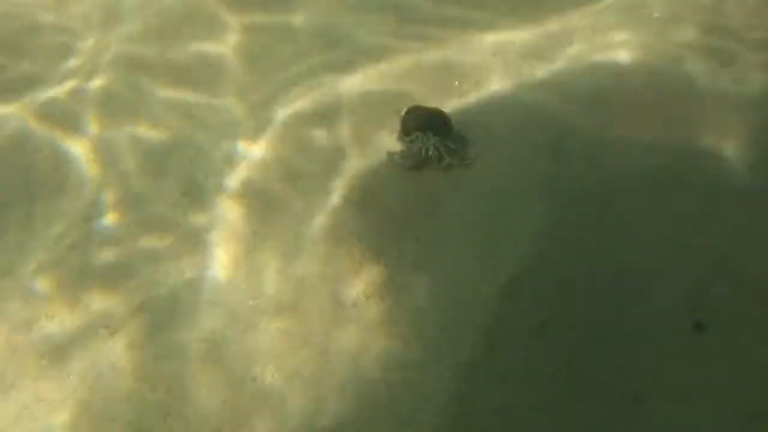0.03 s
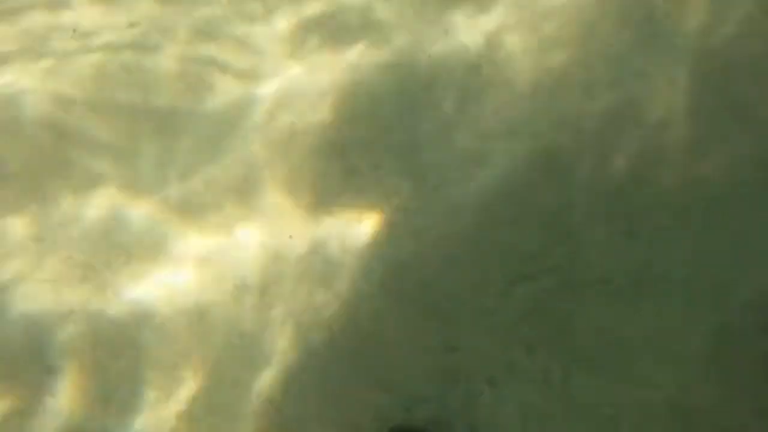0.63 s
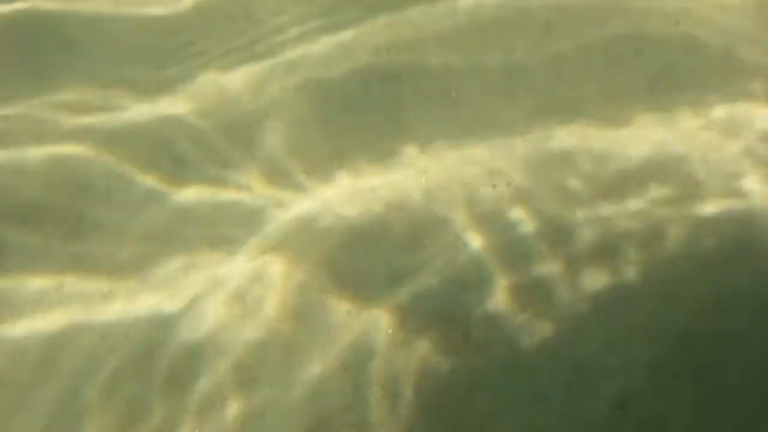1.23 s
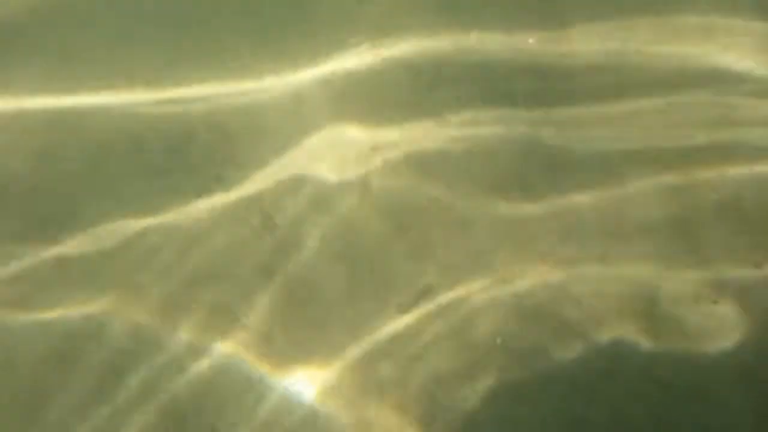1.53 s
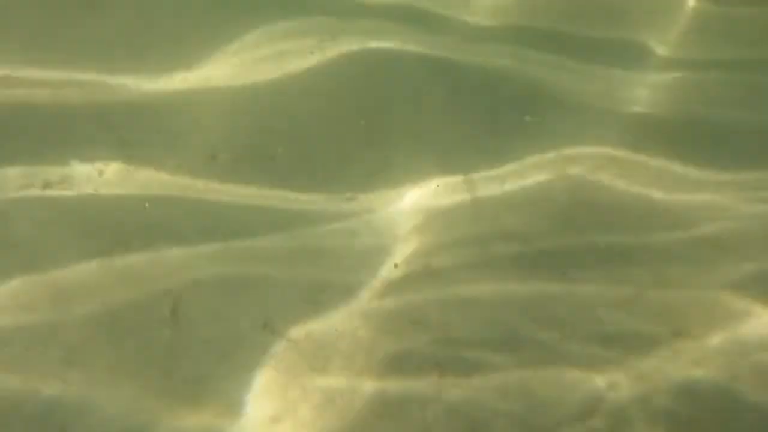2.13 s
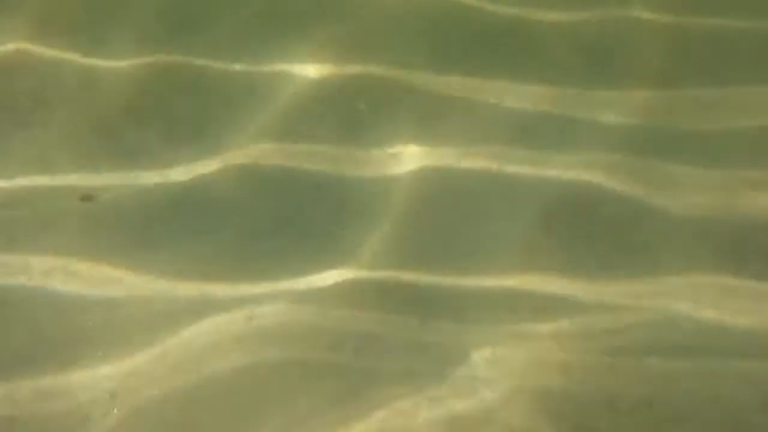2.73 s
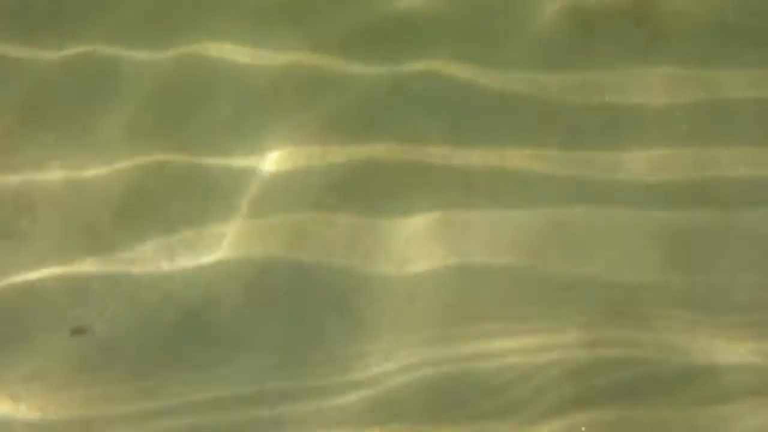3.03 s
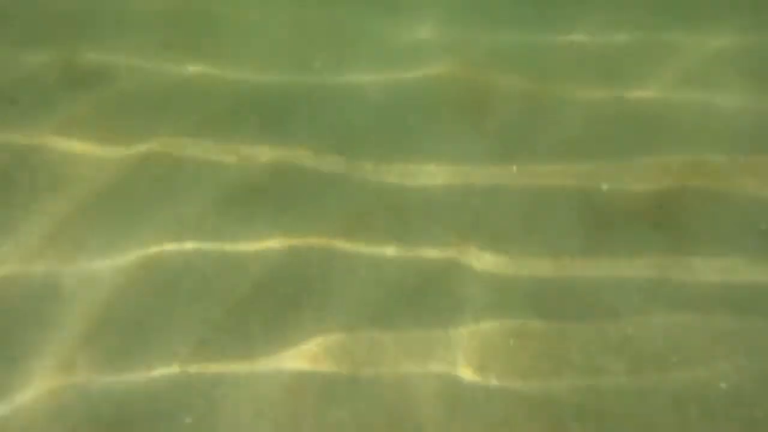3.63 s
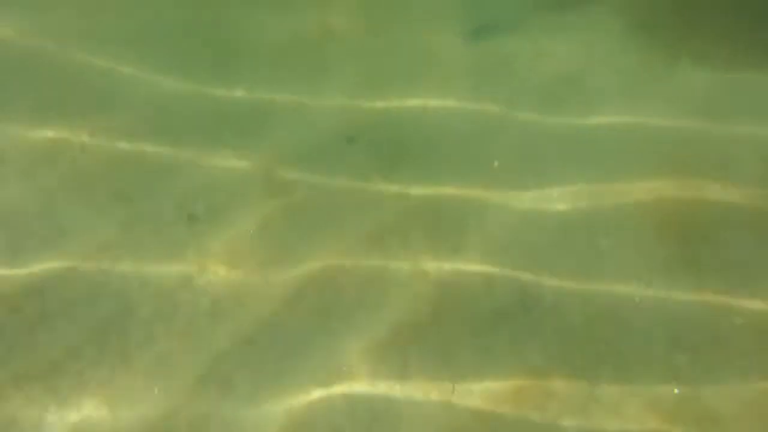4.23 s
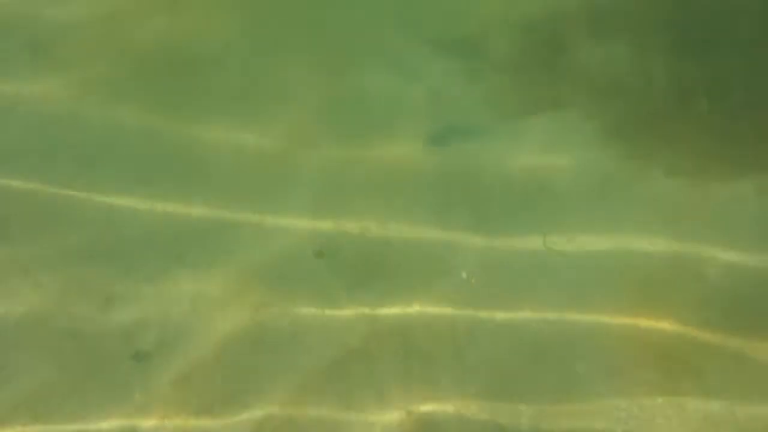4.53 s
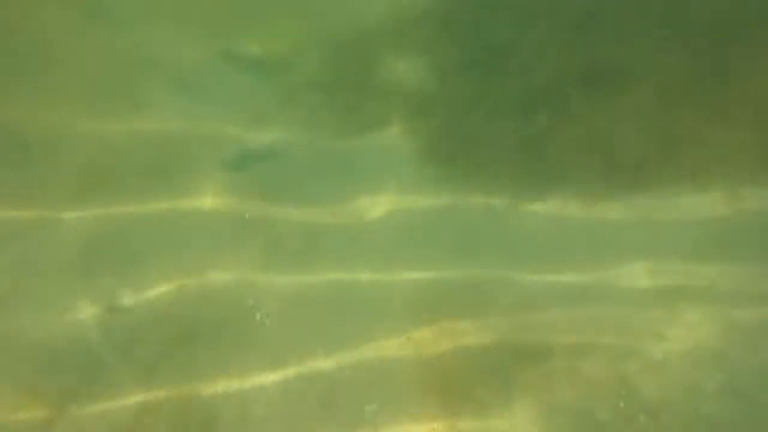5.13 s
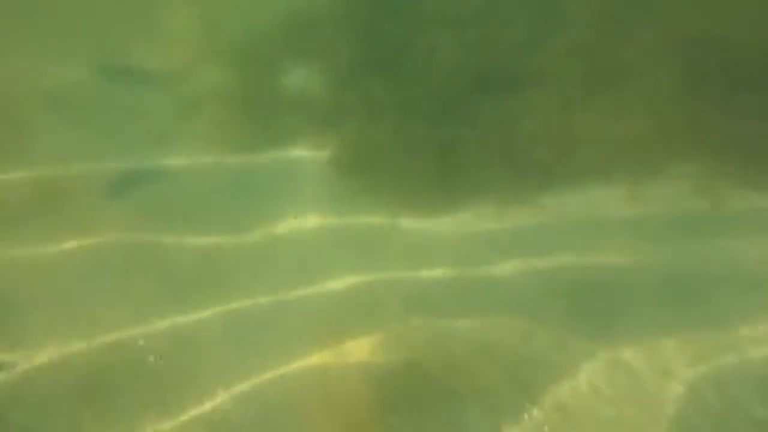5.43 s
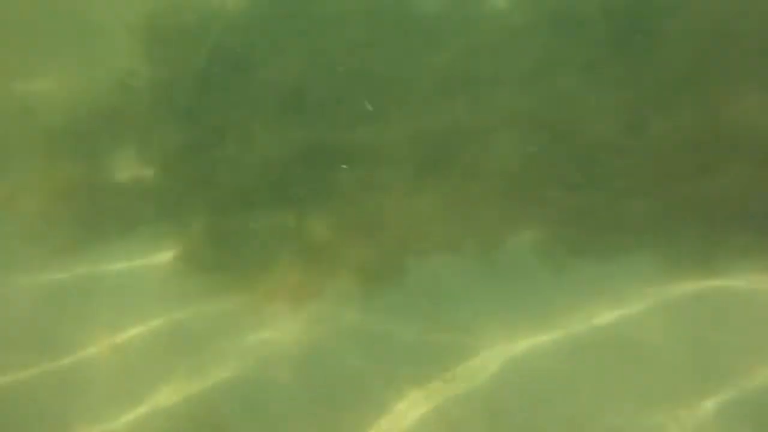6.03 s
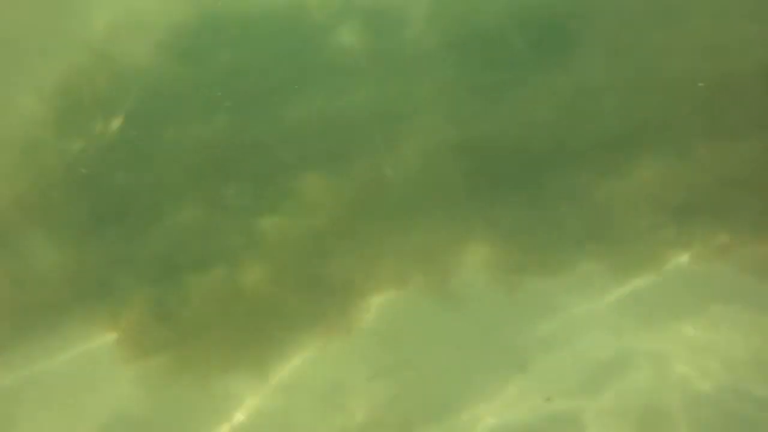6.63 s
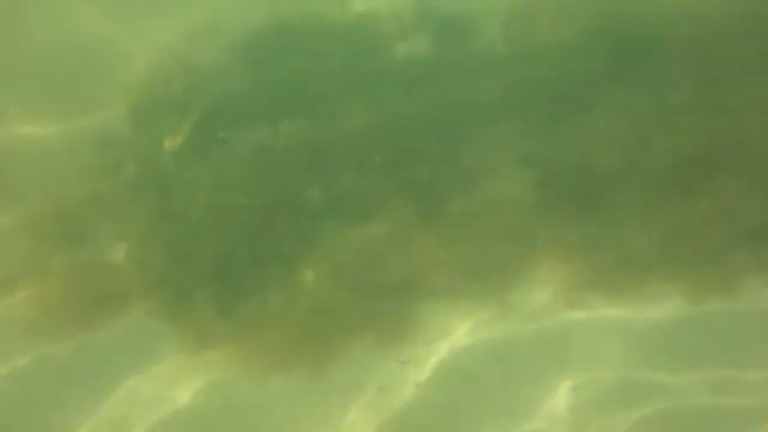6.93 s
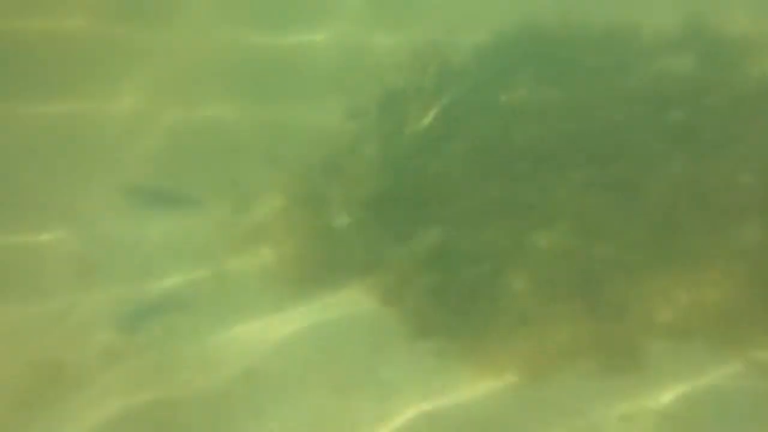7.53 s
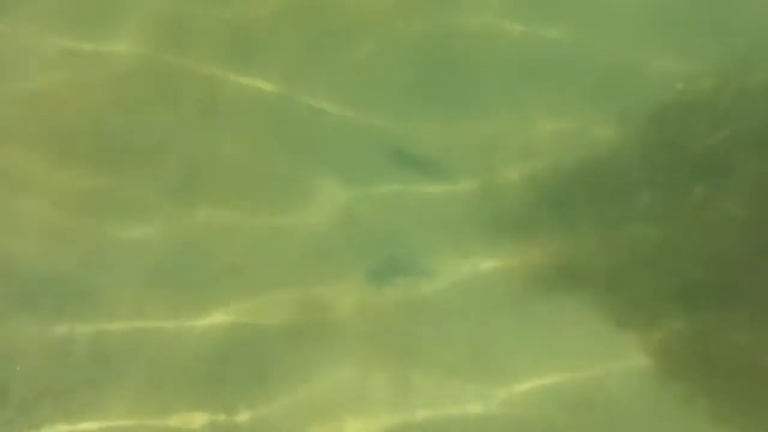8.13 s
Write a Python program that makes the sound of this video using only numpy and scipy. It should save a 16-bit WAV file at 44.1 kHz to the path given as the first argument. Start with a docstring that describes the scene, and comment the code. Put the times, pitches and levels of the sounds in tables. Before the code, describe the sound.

Low underwater rumble with soft, dull bumps against a camera case, a few sharp ticks and small bubbles.

```python
"""Shallow sea water rumbles against the waterproof case of a camera carried through it.
Eddies press on the case, soft pushes bump it and gushes pass over it; the hand on it and stray sand
excite its damped modes as sharp ticks. Small bubbles ring as resonators, a soft wash grows as the
water gets livelier, and a fine hiss swells with the whole sound."""
import sys
import numpy as np
from scipy import signal
from scipy.fft import rfft, irfft
from scipy.io import wavfile
from scipy.ndimage import uniform_filter1d

SR = 44100
rng = np.random.default_rng(int(sys.argv[2]) if len(sys.argv) > 2 else 0)


def digitize_waveform(pressure):
    """Quantize a signal to 16-bit integers and store it at the path in sys.argv[1].

    Rows of a 2-D input are taken as channels; values are limited to [-1, 1].
    """
    field = np.atleast_2d(pressure).T
    bounded = np.clip(field, -1, 1)
    quanta = np.round(bounded * 32767).astype(np.int16)
    wavfile.write(sys.argv[1], SR, quanta)


N = 370440
TIME = np.arange(N) / SR
BIN_HZ = np.arange(N // 2 + 1) * SR / N

# Modes of the water-damped case, in low, middle and high groups: pitch_hz, level_db, t60_s
CASE_MODES = [
    [(1120, -25, 0.005), (1590, -12.5, 0.0059)],
    [(2750, -24, 0.0065), (4780, -12.5, 0.0039), (5600, -13, 0.0027)],
    [(7270, -5.5, 0.0048), (8080, 0.5, 0.0025), (8930, -2.5, 0.0016), (10200, -30, 0.0019)],
]


def from_db(db):
    """Amplitude ratio: tenfold for every 20 dB."""
    return 10 ** (np.asarray(db) / 20)


def power_sum_db(db, *amplitudes):
    """Incoherent sources add in power: a level in dB joined by further amplitudes."""
    return 10 * np.log10(from_db(db) ** 2 + sum(amplitude ** 2 for amplitude in amplitudes))


def unit_rms(x):
    """Normalisation to unit mean power."""
    return x / np.sqrt(np.mean(x ** 2) + 1e-20)


def envelope(x, span_s):
    """Running rms: the root of the locally averaged power."""
    size = max(int(span_s * SR), 1)
    return np.sqrt(np.abs(uniform_filter1d(uniform_filter1d(x ** 2, size), size)) + 1e-18)


def lag(x, time_constant_s):
    """First-order relaxation: the output follows the input with an exponential memory."""
    fade = np.exp(-1 / (time_constant_s * SR))
    return signal.lfilter([1 - fade], [1, -fade], x)


def curve(rows):
    """Linear interpolation of (time_s, value) rows at every sample."""
    return np.interp(TIME, *np.transpose(rows))


def coloured(x, spectrum):
    """Spectral shaping by gains interpolated over log frequency; unit rms."""
    hz, db = np.transpose(spectrum)
    gain = from_db(np.interp(np.log(np.maximum(BIN_HZ, 1)), np.log(hz), db))
    return unit_rms(irfft(rfft(x) * gain, N))


def drift(rate_hz):
    """Random fluctuation: low-passed noise of unit rms."""
    return unit_rms(irfft(rfft(rng.standard_normal(N)) / (1 + (BIN_HZ / rate_hz) ** 2), N))


def ring(force, hz, t60_s):
    """Damped oscillator: a unit impulse starts a decaying sine of height 1."""
    decay = np.exp(-np.log(1000) / (t60_s * SR))
    step = 2 * np.pi * hz / SR
    return signal.lfilter([0, np.sin(step)], [1, -2 * decay * np.cos(step), decay ** 2], force + 1e-18)


def add(out, start_s, sound):
    """Superposition of a sound from its starting time."""
    at = max(int(round(start_s * SR)), 0)
    out[at:at + len(sound)] += sound[:N - at]


def fizz(sound, knee_db=-43.0, exponent=0.47, ceiling_db=-64.0, flutter_db=2.0):
    """Amplitude modulation: a fine hiss follows the envelope of the sound and saturates above a knee."""
    # Hiss spectrum: frequency_hz, gain_db
    spectrum = [(30, -1), (300, 9.5), (1000, 4.5), (2500, 0.5), (3600, -3), (4700, -4), (6000, -1.5),
                (7500, 0), (9000, .5), (10200, 2), (12000, 1), (16000, 2)]
    loudness = lag(envelope(sound, span_s=0.0023), time_constant_s=0.011) / from_db(knee_db)
    opening = (loudness / np.sqrt(1 + loudness ** 2)) ** exponent
    hiss = coloured(rng.standard_normal(N), spectrum)
    return hiss * opening * from_db(ceiling_db + flutter_db * drift(rate_hz=30))


def sand(taps_per_s=7, spread_db=3.5, weakest_db=-65.5):
    """Impact excitation: stray grains arrive as a Poisson process and ring the high modes of the case."""
    sizes = from_db(weakest_db + spread_db * np.minimum(rng.exponential(1, N), 3))
    sizes *= rng.choice([-1, 1], N)
    taps = sizes * (rng.random(N) < taps_per_s / SR)
    return sum(ring(taps, hz, t60_s) * from_db(db) for hz, db, t60_s in CASE_MODES[-1])


def stir(lively_db=-60, lift_db=1.0, unrest_db=1.5):
    """Common modulation: the slow, restless swell of the water, in dB relative to its lively state."""
    # Liveliness of the water: time_s, level_db
    liveliness = [(0, -78.5), (1.15, -84), (1.5, -75.5), (1.75, -80.5), (2.5, -81), (3.5, -77.5),
                  (3.8, -71), (4.12, -74.5), (4.55, -65), (4.8, -76), (5.15, -70), (5.5, -60), (5.75, -68),
                  (6.0, -64), (6.2, -72.5), (6.9, -65), (7.42, -61), (8.2, -64), (8.4, -63.5)]
    return curve(liveliness) + lift_db + unrest_db * drift(rate_hz=10.4) - lively_db


def swish(stir_db, gush, lively_db=-71, stir_share=0.66, flutter_db=3.0):
    """Resonance under broadband forcing: fast water excites a narrow, hissy band of the case."""
    # Response of the case to fast water: frequency_hz, gain_db
    spectrum = [(1000, -9.5), (3600, -14.5), (4100, -13), (4550, -1.5), (5000, -8), (5800, -16),
                (8000, -12.5), (14000, -12.5)]
    level_db = power_sum_db(lively_db + stir_share * stir_db, gush)
    hiss = coloured(rng.standard_normal(N), spectrum)
    return hiss * from_db(level_db + flutter_db * drift(rate_hz=130))


def churn(gush, push, gush_db=-9.0, push_db=-40, flutter_db=3.5):
    """Turbulent noise: stirred water makes a broad, dull rush, raised by gushes and bumps."""
    # Strength of the churn around the case: time_s, level_db
    strength = [(0, -91), (.35, -86), (.7, -80), (1.8, -83), (2.1, -83.5), (2.8, -89), (3.15, -71.5),
                (3.8, -76.5), (4.1, -80.5), (4.47, -65.5), (4.95, -79), (5.43, -72.5), (6.3, -74),
                (7.15, -66.5), (7.88, -64.5), (8.15, -70), (8.4, -64.5)]
    # Churn spectrum: frequency_hz, gain_db
    spectrum = [(40, -29), (200, 9.5), (350, 6), (550, 2), (800, -3.5), (1100, -9), (1500, -6.5),
                (2300, -22.5), (3200, -34), (8000, -46)]
    level_db = power_sum_db(curve(strength), from_db(gush_db) * gush, from_db(push_db) * push)
    rush = coloured(rng.standard_normal(N), spectrum)
    return rush * from_db(level_db + flutter_db * drift(rate_hz=35))


def wash(stir_db, gush, lively_db=-60, stir_share=1.166, bubbles_per_s=900, t60_cycles=30):
    """Source and filter: many faint bubbles over a smooth rush, heard through the case's resonances."""
    # Wash spectrum through the case: frequency_hz, gain_db
    spectrum = [(40, -40), (300, -6), (750, -2.5), (1000, -1.5), (1250, 2), (1460, 3), (1650, -1.5),
                (1900, -12), (2300, -10), (2500, -26.5), (2800, -10.5), (3500, -30), (6000, -30.5),
                (9000, -38)]
    spread_db, flutter_db = 3.0, 1.5
    sizes = from_db(spread_db * np.minimum(rng.exponential(1, N), 4)) * rng.choice([-1, 1], N)
    births = sizes * (rng.random(N) < bubbles_per_s / SR)
    pitches_hz = np.geomspace(900, 3200, num=30)
    pitch_index = rng.integers(0, len(pitches_hz), N)
    cloud = sum(ring(births * (pitch_index == k), hz, t60_cycles / hz) * hz
                for k, hz in enumerate(pitches_hz))
    water = coloured(cloud, spectrum) + coloured(rng.standard_normal(N), spectrum)
    level_db = power_sum_db(lively_db + stir_share * stir_db, gush)
    return unit_rms(water) * from_db(level_db + flutter_db * drift(rate_hz=42))


def bubbles(kick_db=5.5, rise_cycles=1.9, t60_cycles=74):
    """Bubble resonance: pinch-off kicks the case, and the ringing pitch slides with depth and shape."""
    # Single bubbles: start_s, level_db, pitch_hz, slide_fraction
    plinks = [(1.988, -51.5, 1630, -0.054), (2.025, -42.5, 1430, -0.19), (4.923, -49, 1380, -.08),
              (5.248, -50.5, 1490, 0.043), (5.678, -48, 1610, -0.051), (5.823, -50.5, 1580, -.07),
              (5.883, -46, 1380, .03), (6.327, -45, 1306, 0.08), (6.411, -50, 1400, 0.05),
              (6.513, -53.5, 1120, 0.0074), (6.648, -51.5, 1154, .05), (6.715, -34, 1530, -0.069),
              (7.003, -59, 1350, .1), (7.093, -52, 2020, .01), (7.197, -46.5, 1535, -.1),
              (7.905, -48.5, 1210, .1), (7.981, -43.5, 1574, -.08), (8.006, -50.5, 2750, -0.00014)]
    out, t = np.zeros(N), np.arange(SR // 6) / SR
    kick = from_db(kick_db) * ring(1.0 * (t == 0), hz=175, t60_s=0.024)
    for start_s, level_db, pitch_hz, slide in plinks:
        t60_s = t60_cycles / pitch_hz
        hz = pitch_hz * (1 + slide * np.minimum(t / t60_s, 1))
        rise = 1 - np.exp(-t * pitch_hz / rise_cycles)
        decay = np.exp(-np.log(1000) * t / t60_s)
        tone = rise * decay * np.sin(2 * np.pi * np.cumsum(hz) / SR)
        add(out, start_s, from_db(level_db) * (kick + tone))
    return out


def ticks(crunch_s=0.001, band_hz=(880, 11500)):
    """Stick-slip: the hand's snap and tiny crunch ring the case; a hard slip favours the high modes."""
    # Slips: start_s, level_db, bright_db (high modes over the rest), middle_db (middle modes over low)
    slips = [(1.295, -58.5, 7, 0), (1.3720, -45.5, 14, -12), (2.6080, -49, 11, -9),
             (2.6364, -48.5, 15.5, -16), (2.9416, -50, 4, -8), (2.9511, -40, 10, -13), (2.9665, -47, 5, 0),
             (3.1358, -47.5, 11, -8), (3.1802, -44, -37, 2.5), (3.2188, -38.5, -2, 13),
             (3.247, -50, -33, -5), (3.4302, -47.5, 6, 0), (3.4383, -26.5, -6.5, 0),
             (4.3446, -45.5, -17, -6), (4.355, -47, 5, -1), (4.3656, -43.5, 13, -8),
             (4.3707, -29.5, -8.5, -1), (4.4475, -48.5, 10, 0), (4.4646, -47, -8, 20), (4.4706, -48, 2, 4),
             (4.8696, -48, -7, 0), (5.0397, -51, -5, 5), (5.3404, -45, 6, 7), (6.113, -60, -13, 18),
             (7.0332, -39, -7, -1), (7.4294, -53, 3, -7), (7.7238, -42.5, -10, 5), (7.907, -50, -26, -8),
             (8.1055, -51, -3, -8)]
    out, t = np.zeros(N), np.arange(SR // 50) / SR
    for start_s, level_db, bright_db, middle_db in slips:
        crunch = 0.09 * rng.standard_normal(len(t)) * np.exp(-t / crunch_s)
        force = (t == 0) + crunch
        groups = [sum(ring(force, hz, t60_s) * from_db(db) for hz, db, t60_s in modes)
                  for modes in CASE_MODES]
        group_db = np.array([-bright_db - middle_db, -bright_db + middle_db, bright_db]) / 2
        add(out, start_s, from_db(level_db) * (from_db(group_db) @ np.array(groups)))
    return signal.sosfilt(signal.butter(3, band_hz, "band", fs=SR, output="sos"), out + 1e-18)


def gushes(attack_s=0.015, hold_share=0.083):
    """Transient flow: each gush rises fast, holds and ebbs; gives envelopes for rumble, wash and swish."""
    # Gushes over the case: peak_s, length_s, rumble_db, wash_db, swish_db
    surges = [(0.082, 0.079, -53, -68, -66), (0.396, 0.096, -51, -72, -71.5), (0.924, .1, -45, -81, -91),
              (1.349, 0.085, -43, -70, -72), (1.584, 0.079, -48.5, -74, -79),
              (1.917, 0.069, -46.5, -67, -71), (2.055, 0.098, -44.5, -71, -84), (2.46, 0.18, -44, -80, -90),
              (2.938, 0.095, -48.5, -71, -70), (3.337, 0.085, -64, -85, -70.5),
              (3.651, 0.079, -66, -60.5, -66), (3.894, 0.084, -49, -67, -85),
              (4.191, 0.05, -47.5, -71, -83), (4.466, 0.2, -42.5, -65, -66), (5.226, 0.13, -43.5, -65, -70),
              (5.326, 0.074, -49, -60, -64), (5.41, 0.23, -39.5, -60.5, -82), (5.76, .12, -54, -69.5, -73),
              (5.974, .09, -49, -59, -65.5), (6.414, 0.039, -41.5, -73, -84), (6.886, 0.019, -44, -85, -64),
              (7.417, 0.11, -48, -57, -70), (8.29, 0.11, -45, -56.5, -66)]
    out = np.zeros((3, N))
    for peak_s, length_s, *levels_db in surges:
        shape = np.interp(TIME - peak_s, [-attack_s, 0, hold_share * length_s, length_s], [0, 1, 1, 0])
        out += np.outer(from_db(levels_db), shape)
    return out


def bumps(sag=0.092, skew=0.2):
    """Damped oscillation: a soft push rocks the case for a few cycles; pitch sags as water damps it."""
    # Dull bumps on the case: peak_s, level_db, pitch_hz, width_s (at half height)
    pushes = [(0.184, -27.5, 110, 0.014), (0.293, -25.5, 115, 0.012), (0.396, -26.5, 102.5, .011),
              (0.492, -33, 104.4, 0.0095), (0.681, -37, 109, 0.011), (0.922, -48, 130, 0.0085),
              (0.943, -38.5, 95.8, 0.0059), (1.236, -41.5, 128, 0.009), (1.364, -41, 135.2, .015),
              (1.384, -26.5, 98.6, 0.0098), (1.44, -33, 99.4, .016), (1.522, -17.5, 122.5, 0.012),
              (1.534, -32.5, 88.8, 0.015), (2.066, -35, 118.2, 0.01), (2.332, -38.5, 89.4, 0.016),
              (2.396, -30, 110, 0.0085), (2.616, -18, 89.2, 0.0096), (2.788, -24.5, 119.1, 0.011),
              (2.957, -39, 129.4, 0.0036), (3.041, -32, 146.3, 0.0084), (3.173, -29.5, 115.7, 0.0073),
              (3.316, -37.5, 130.5, 0.0088), (3.443, -36, 164.7, 0.0059), (3.654, -35, 134.7, 0.0061),
              (3.847, -35.5, 123, 0.016), (3.896, -29, 105, 0.011), (4.353, -24.5, 120.7, 0.0099),
              (4.377, -28, 130.6, 0.0042), (4.488, -19, 140.7, 0.011), (4.509, -26.5, 81.6, 0.0068),
              (4.691, -31, 109, .007), (4.755, -27.5, 116.2, 0.0063), (4.842, -28, 115, 0.0083),
              (4.911, -29.5, 114.7, 0.0058), (4.987, -26.5, 113.4, .007), (5.027, -17, 123.8, 0.0093),
              (5.344, -33.5, 110.3, 0.017), (5.498, -32, 122.4, 0.017), (5.68, -22.5, 108.7, 0.014),
              (6.358, -20, 109.5, .013), (6.559, -33, 105.5, 0.022), (6.718, -28.5, 144, 0.0087),
              (7.013, -26, 106.6, 0.0092), (7.093, -31.5, 132.3, 0.0095), (7.227, -28, 96.7, 0.013),
              (7.323, -36, 100.7, .008), (7.394, -32, 118, 0.0057), (7.45, -28.5, 123.5, .01),
              (7.482, -36, 103, 0.0099), (7.869, -32, 128.3, 0.021), (7.989, -28.5, 121.5, 0.0088),
              (8.113, -32, 125.9, 0.0085), (8.31, -29.5, 102.8, 0.0096)]
    out, t = np.zeros(N), np.arange(-SR // 16, SR // 16) / SR
    for peak_s, level_db, pitch_hz, width_s in pushes:
        age = t / width_s
        stretch = 1 + skew * np.tanh(2 * age)  # rises faster than it dies
        swell = 2 ** -((2 * age / stretch) ** 2)
        hz = pitch_hz * (1 - sag * np.tanh(age))
        phase = 2 * np.pi * np.cumsum(hz) / SR + rng.uniform(0, 2 * np.pi)
        add(out, peak_s + t[0], from_db(level_db) * swell * np.sin(phase))
    return out


def rumble(gush, push, lift_db=0.5, wake_db=-11, wake_s=0.013, evenness=0.94, lumps_db=4.5):
    """Turbulent pressure: eddies of the flow, the gushes and each bump's wake load the case in lumps."""
    # Pressure of the flow on the case: time_s, level_db
    flow = [(0, -56), (.45, -56), (.6, -62), (1.14, -65), (1.42, -50), (1.8, -63), (2.1, -57), (2.55, -55),
            (2.87, -61), (3.1, -52.5), (3.5, -56.5), (3.8, -59.5), (4.03, -67.5), (4.15, -61), (4.5, -52),
            (5.0, -47), (5.15, -51.5), (5.5, -54), (6.1, -51), (6.93, -55.5), (7.2, -49), (7.65, -52),
            (7.98, -44.5), (8.4, -48.5)]
    # Eddy spectrum: frequency_hz, gain_db
    spectrum = [(20, -38), (30, -59), (48, -9), (65, 3), (100, 0.5), (132, 4.5), (165, -5.5), (210, -15.5),
                (300, -27), (500, -36.5), (1000, -42), (2500, -55)]
    wake = from_db(wake_db) * lag(push, wake_s)
    level_db = power_sum_db(curve(flow) + lift_db, gush, wake)
    eddies = coloured(rng.standard_normal(N), spectrum)
    eddies = unit_rms(eddies / envelope(eddies, span_s=0.048) ** evenness)  # flattens the noise's swells
    return eddies * from_db(level_db + lumps_db * drift(rate_hz=23.5))


def scene():
    """Superposition: every source reaches the one microphone through the case."""
    stir_db = stir()
    gush_rumble, gush_wash, gush_swish = gushes()
    knocks = bumps()
    push = envelope(knocks, span_s=0.02)
    shaking = rumble(gush_rumble, push) + knocks
    water = wash(stir_db, gush_wash) + swish(stir_db, gush_swish) + churn(gush_wash, push)
    sound = shaking + water + bubbles() + ticks() + sand()
    return (sound + fizz(sound))[None]


def record(dry, low_cut_hz=43, high_cut_hz=15900):
    """Band limiting: steep filters remove the deepest bass and the top of the treble."""
    high_pass = np.sqrt(1 - 1 / (1 + (BIN_HZ / low_cut_hz) ** 8))
    thinned = irfft(rfft(dry) * high_pass, N)
    return signal.sosfilt(signal.ellip(12, 0.1, 70, high_cut_hz, fs=SR, output="sos"), thinned)


dry = scene()
out = record(dry)
digitize_waveform(out)
```